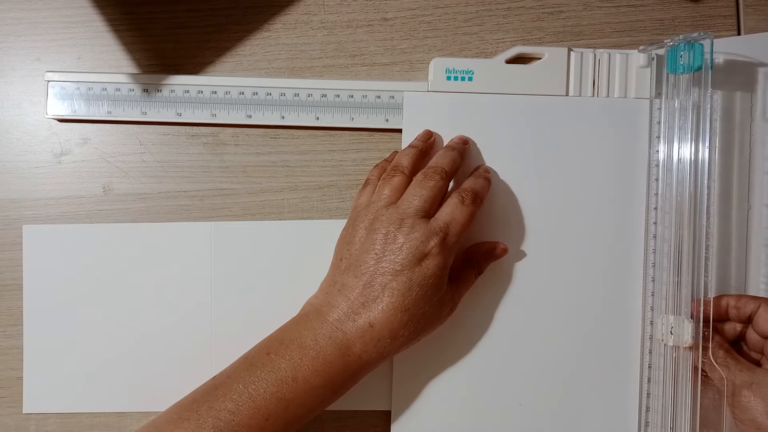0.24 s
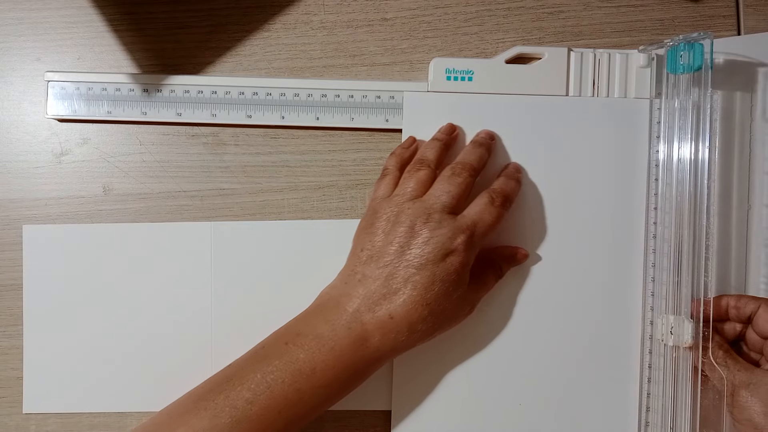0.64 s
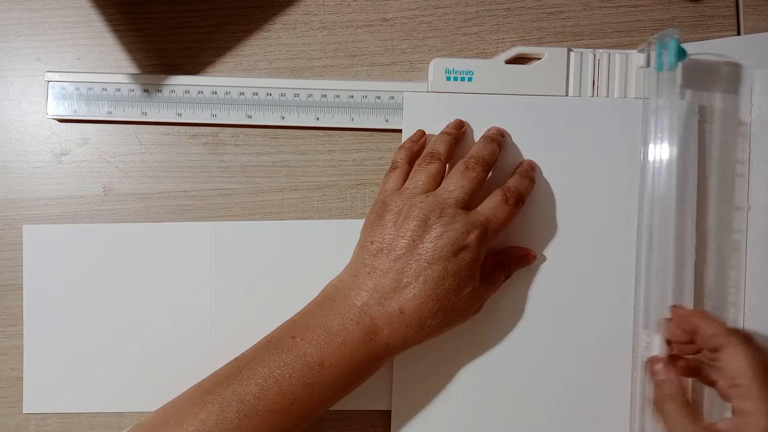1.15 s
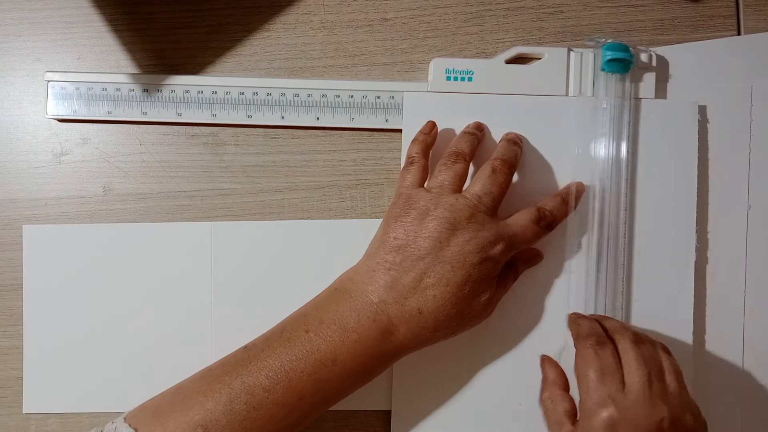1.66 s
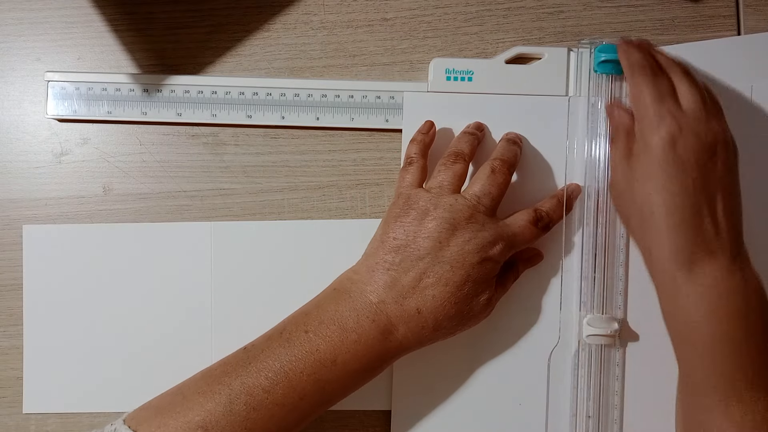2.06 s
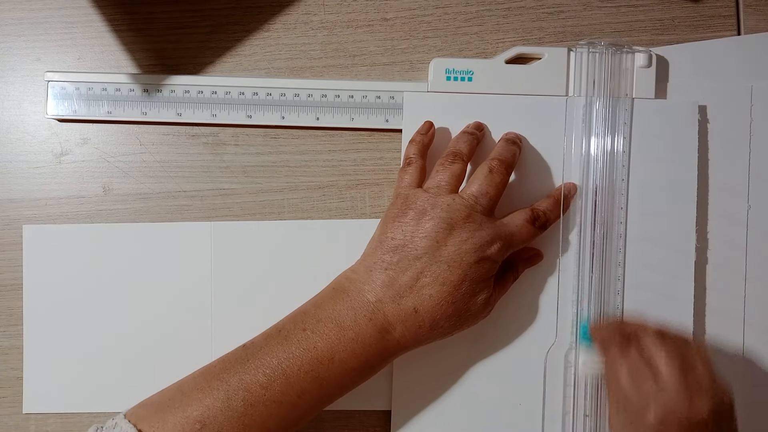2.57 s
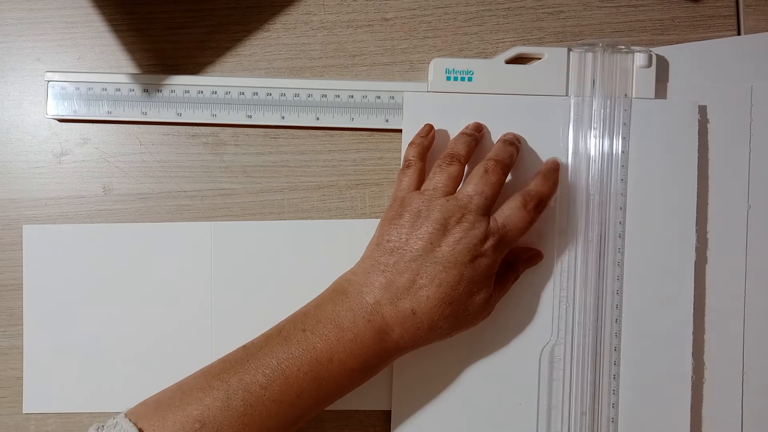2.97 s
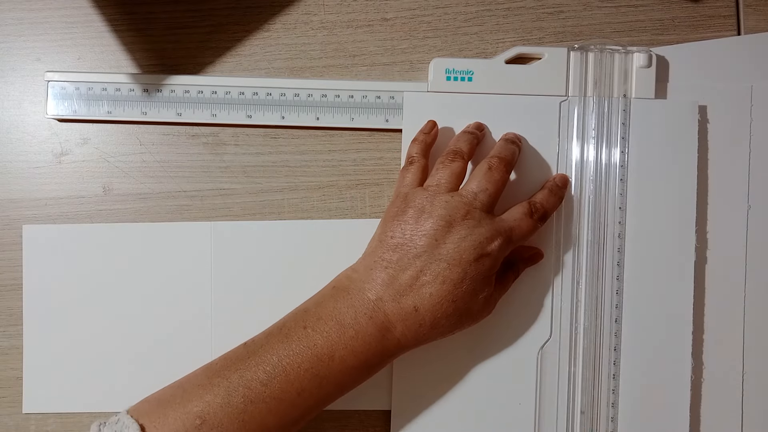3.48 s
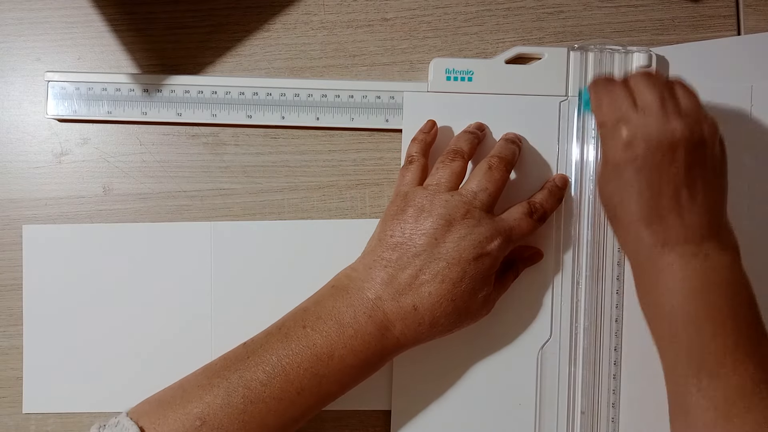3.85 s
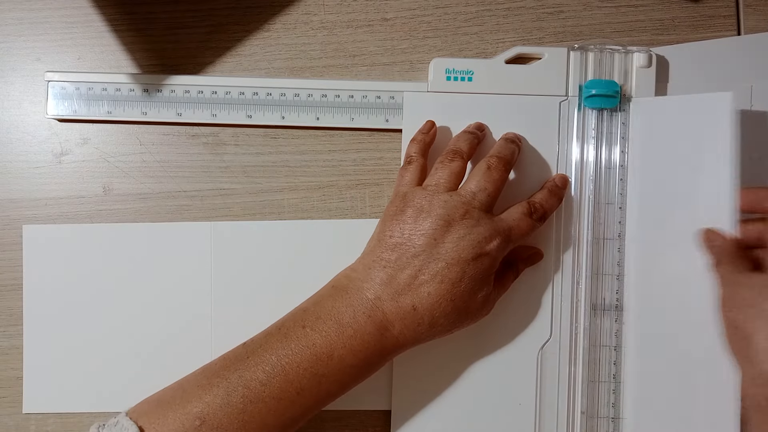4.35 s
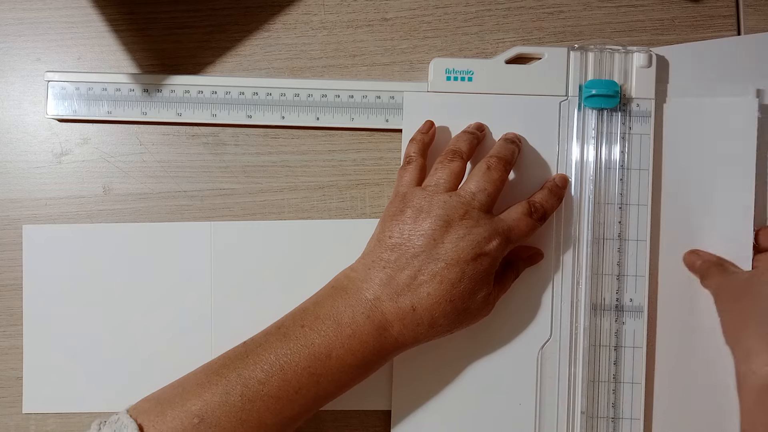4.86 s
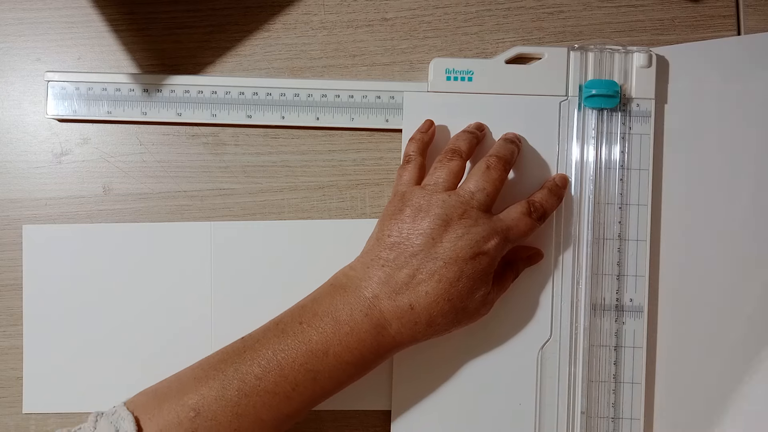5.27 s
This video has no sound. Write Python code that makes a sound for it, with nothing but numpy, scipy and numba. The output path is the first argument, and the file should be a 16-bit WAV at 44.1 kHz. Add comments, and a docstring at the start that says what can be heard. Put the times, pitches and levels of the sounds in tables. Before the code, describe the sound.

Plastic rail of a paper trimmer clacks over and snaps shut, a blade rasps quickly through paper, then the offcut rustles and snaps away.

```python
"""A plastic paper trimmer on a wooden desk in a small room; faint birds, and a soft low hum comes and goes.
First the clear rail is gripped and swung over in short clacks, then the carriage slides dully to its stop.
The rail snaps home; the blade rasps through the sheet, its rail resonance climbing, and stops.
A hand bumps the base; the offcut rubs, judders and snaps as it is drawn out and laid aside.
Contacts are noise bursts ringing damped modes; rubbing is coloured random slips; birds are gliding sines."""
import sys
import numpy as np
from scipy import signal
from scipy.fft import rfft, irfft
from scipy.io import wavfile
from scipy.ndimage import map_coordinates
from numba import njit

SR = 44100
rng = np.random.default_rng(int(sys.argv[2]) if len(sys.argv) > 2 else 0)


def dump(signal):
    """Clip the signal to [-1, 1] and save it as 16-bit WAV at the path in sys.argv[1]."""
    limited = np.clip(np.atleast_2d(signal).T, -1, 1)
    pcm = np.round(limited * 32767).astype(np.int16)
    wavfile.write(sys.argv[1], SR, pcm)


N = 243431
T = np.arange(N) / SR


def amp(db):
    """Decibels to gain."""
    return 10 ** (np.asarray(db) / 20)


def unit(x):
    """Scale to rms 1."""
    return x / np.sqrt(np.mean(x ** 2))


def walk(rate_hz):
    """Slow random curve of rms 1: straight lines between rate_hz random points per second."""
    return unit(np.interp(T * rate_hz, np.arange(N), rng.standard_normal(N)))


def envelope(start_s, hold_s, rise_s, fade_s):
    """Gain that rises exponentially to 1 at start_s, holds, and dies away exponentially."""
    before_s = np.minimum(T - start_s, 0)
    after_s = np.maximum(T - start_s - hold_s, 0)
    return np.exp(before_s / rise_s - after_s / fade_s)


def grains(rate_hz, spread_db):
    """Dense tiny slips of uneven size, at rms 1."""
    hits = rng.random(N) < rate_hz / SR
    return unit(hits * rng.standard_normal(N) * amp(spread_db * rng.standard_normal(N)))


def through(x, response):
    """Pass a sound through an impulse response."""
    return signal.fftconvolve(x, response)[:N]


def colour(points, tilt_db_per_octave=0, size=2048):
    """Minimum-phase response of unit energy with this spectrum, tilted above 512 Hz."""
    hz, level_db = np.transpose(points)
    octave = np.log2(np.maximum(np.arange(size // 2 + 1) * SR / size, 10))
    gain_db = np.interp(octave, np.log2(hz), level_db) + tilt_db_per_octave * np.maximum(octave, 9)
    cepstrum = irfft(np.log(amp(gain_db)))
    # fold the cepstrum to make the response causal
    cepstrum[1:size // 2] *= 2
    cepstrum[size // 2 + 1:] = 0
    response = irfft(np.exp(rfft(cepstrum)))
    return response / np.linalg.norm(response)


def ring(modes, detune=0):
    """Unit-energy sum of damped modes; detune is the random relative pitch spread, as parts seat differently."""
    t, y = T[:SR // 2], 0
    for hz, level_db, t60_s in modes:
        hz = hz * (1 + detune * rng.standard_normal())
        decay = np.exp(-np.log(1000) * t / t60_s)
        y = y + amp(level_db) * decay * np.sin(2 * np.pi * hz * t) * rng.choice([-1, 1])
    return y / np.linalg.norm(y)


def resonate(x, modes):
    """Parallel resonances (pitch_hz, width_hz, level_db), at rms 1."""
    bands = (amp(level_db) * signal.lfilter(*signal.iirpeak(hz, hz / width_hz, SR), x)
             for hz, width_hz, level_db in modes)
    return unit(sum(bands))


@njit
def sweep(x, hz, width_hz):
    """State-variable band-pass whose centre moves."""
    y, band, low = np.empty(len(x)), 0., 0.
    for i in range(len(x)):
        g, k = np.tan(np.pi * hz[i] / SR), width_hz / hz[i]
        v = (band + g * (x[i] - low)) / (1 + g * (g + k))
        band, low, y[i] = 2 * v - band, low + 2 * g * v, k * v
    return y


def brighten(x, bright_db, split_hz):
    """Trade lows for highs: positive values brighten the rub, negative ones dull it."""
    low = signal.sosfilt(signal.butter(1, split_hz, fs=SR, output="sos"), x)
    return low * amp(-bright_db / 2) + (x - low) * amp(bright_db / 2)


def patchy(x, depth_db, rate_hz, patch_hz):
    """As the contact shifts, patches of the spectrum swell and fade on their own; rms 1."""
    hz, s, bands = signal.stft(x, SR, nperseg=512)
    places = np.meshgrid(hz / patch_hz, s * rate_hz, indexing="ij")
    field = map_coordinates(rng.standard_normal((300, 900)), places, order=1, mode="mirror")
    return unit(signal.istft(bands * amp(depth_db * unit(field)), SR)[1][:N])


def tail(t60_s, treble_t60_s, build_s, split_hz=7500):
    """Diffuse noise echoes of unit energy; the top treble dies first."""
    t, y = T[:SR], 0
    for side, seconds in [("low", t60_s), ("high", treble_t60_s)]:
        split = signal.butter(4, split_hz, side, fs=SR, output="sos")
        band = signal.sosfilt(split, rng.standard_normal(SR))
        y = y + band * np.exp(-np.log(1000) * t / seconds) * (1 - np.exp(-(t / build_s) ** 2))
    return y / np.linalg.norm(y)


# air spectrum: [pitch_hz, level_db]
AIR_SPECTRUM = [(15, -71.5), (25, -4), (86, -0.5), (165, 1), (222, -13.5), (316, -5), (812, -11.5),
                (2810, -15.5), (3580, -12.5), (5520, -17), (6850, -19), (8270, -37), (10300, -41),
                (13400, -28), (15800, -42.5)]
AIR_DB = -76
# swells of the hum: [start_s, hold_s, level_db]
HUM_SWELLS = [(0.349, 0.033, -66.5), (0.434, 0.069, -64), (0.563, 0.032, -67), (0.654, 0.058, -68.5),
              (0.815, 0.051, -70), (0.987, 0.048, -70), (1.077, 0.11, -72), (1.43, 0.038, -67),
              (1.582, 0.13, -67.5), (1.863, 0.057, -61.5)]
HUM_HZ, HUM_WIDTH_HZ, HUM_REST_DB, HUM_RISE_S, HUM_FADE_S = 224.3, 26, -81, 0.0084, 0.022


def room_tone():
    """Noise shaped into quiet air, a deep rumble and a narrow low hum that swells and fades."""
    air = unit(through(rng.standard_normal(N), colour(AIR_SPECTRUM, size=8192)))
    air = air * amp(AIR_DB + .5 * walk(0.84))
    hum_mode = [(HUM_HZ, HUM_WIDTH_HZ, 0)]
    hum = resonate(resonate(rng.standard_normal(N), hum_mode), hum_mode)
    swells = sum(amp(level_db) * envelope(start_s, hold_s, HUM_RISE_S, HUM_FADE_S)
                 for start_s, hold_s, level_db in HUM_SWELLS)
    hum = hum * np.hypot(amp(HUM_REST_DB), swells)
    rumble = resonate(resonate(rng.standard_normal(N), [(83.5, 63, 0)]), [(89, 99, 0)])
    return air + hum + rumble * amp(-78.5 + 2 * walk(0.43))


# one bird's repeated rising call: [start_s]
CALL_STARTS = [1.666, 1.909, 2.155]
CALL_S, CALL_START_HZ, CALL_END_HZ, CALL_DB, CALL_TRILL_DEPTH_HZ = .085, 1650, 2620, -66, 255
# whistles of other birds: [start_s, length_s, start_hz, end_hz, level_db, trill_depth_hz]
WHISTLES = [(0.482, .27, 4000, 3910, -74.5, 90), (.61, 0.084, 4730, 4200, -64.5, 440),
            (0.662, 0.25, 2580, 2393, -70, 142), (0.754, 0.14, 4190, 4450, -63, 293),
            (.92, 0.072, 4530, 4230, -65.5, 250), (0.986, 0.062, 3740, 3375, -71, 348),
            (1.235, 0.136, 3390, 3605, -76, 30), (1.521, .12, 3700, 4250, -73, 430),
            (1.719, .1, 4730, 5060, -65, 250), (2.027, .075, 4580, 4970, -70.5, 200),
            (2.265, 0.085, 3910, 3830, -63.5, 400), (2.425, 0.08, 3184, 3280, -62.5, 171),
            (2.408, .06, 4070, 4200, -65.5, 410), (2.513, .05, 4340, 4080, -63.5, 300),
            (2.996, 0.11, 3310, 3600, -59.5, 240), (3.468, 0.075, 4900, 4300, -65.5, 250),
            (5.477, 0.047, 4930, 4380, -71, 250)]


def birds():
    """Sines with a rough trill that glide and level off, blurred on their way indoors."""
    out = np.zeros(N)
    trill_rate_hz = 140 * amp(3 * walk(120))
    trill = np.sin(2 * np.pi * np.cumsum(trill_rate_hz) / SR)
    calls = [(start_s, CALL_S, CALL_START_HZ, CALL_END_HZ, CALL_DB, CALL_TRILL_DEPTH_HZ)
             for start_s in CALL_STARTS]
    for start_s, length_s, start_hz, end_hz, level_db, trill_depth_hz in calls + WHISTLES:
        on = (T > start_s) & (T < start_s + length_s)
        progress = (T[on] - start_s) / length_s
        glide_hz = start_hz + (end_hz - start_hz) * np.sin(np.pi / 2 * progress)
        hz = glide_hz + trill_depth_hz * trill[on]
        swell = np.sqrt(np.sin(np.pi * progress))
        out[on] += amp(level_db) * swell * np.sin(2 * np.pi * np.cumsum(hz) / SR)
    return out + through(out, tail(t60_s=0.3, treble_t60_s=0.25, build_s=0.0037))


# rub spectrum: [pitch_hz, level_db]
RUB_SPECTRUM = [(59, -53.5), (100, -8), (259, -18.5), (450, -7), (580, -18.5), (717, -8), (797, -21.5),
                (1190, -6), (1940, -7), (2670, -2.5), (6490, -3.5), (8020, -15.5), (10100, -12),
                (13100, -27.5), (15800, -16.5)]
# sheet shifted under the hand, carriage slid dully along the rail, offcut drawn out and laid aside:
# [full_level_s, hold_s, rise_s, fade_s, level_db, bright_db]
RUBS = [(.45, 0.33, .05, .05, -79, 12), (0.803, 0.027, .025, 0.036, -62.5, -1.5),
        (.95, 1.6, .05, 0.27, -82.5, -5.5), (2.57, 0.53, .15, .05, -70.5, -14),
        (4.199, 0.074, .0006, .03, -65.5, 11), (4.264, 0.15, .01, .03, -56.5, 12),
        (4.402, 0.024, .012, 0.024, -36, -1), (4.478, 0.052, .02, 0.052, -51.5, -20),
        (4.717, 0.055, 0.022, 0.048, -62.5, -5.5), (4.87, 0.012, .006, 0.17, -55.5, -7.5),
        (5.012, 0.057, .015, 0.05, -58.5, 7.5), (5.144, 0.035, 0.011, 0.097, -60, 11.5),
        (5.296, 0.076, 0.046, 0.035, -69, 12)]


def rubbing():
    """Sheet and sliding carriage rub in uneven slips; each move swells, holds and dies away."""
    rub = through(grains(rate_hz=9000, spread_db=-1.5), colour(RUB_SPECTRUM))
    rub = patchy(rub, depth_db=3, rate_hz=35, patch_hz=400)
    gains = [amp(level_db) * envelope(full_level_s, hold_s, rise_s, fade_s)
             for full_level_s, hold_s, rise_s, fade_s, level_db, _ in RUBS]
    powers = np.array(gains) ** 2 + 1e-20
    power = powers.sum(axis=0)
    # brightness averaged over the moves, weighted by power
    bright_db = np.array(RUBS)[:, -1] @ powers / power
    return brighten(rub, bright_db, split_hz=1260) * np.sqrt(power) * amp(2.3 * walk(110))


# sheet edge juddering over the base: [start_s, hold_s, level_db, resonance_hz]
JUDDERS = [(4.194, 0.056, -52.5, 1343), (4.344, 0.17, -52.5, 1243), (5.155, 0.088, -65.5, 1620)]
JUDDER_RISE_S, JUDDER_FADE_S, JUDDER_SAG_OCTAVES_PER_S, JUDDER_OCTAVE_DB = .0005, 0.039, 0.64, -15


def sheet_edge():
    """The dragged edge judders in a resonance and its octave, which sag as more of the sheet hangs free."""
    gain, hz = 0, JUDDERS[0][-1]
    for start_s, hold_s, level_db, resonance_hz in JUDDERS:
        gain = gain + amp(level_db) * envelope(start_s, hold_s, JUDDER_RISE_S, JUDDER_FADE_S)
        sagging_hz = resonance_hz * 2 ** (-JUDDER_SAG_OCTAVES_PER_S * (T - start_s))
        hz = np.where(T < start_s, hz, sagging_hz)
    hz = hz * amp(0.14 * walk(60))
    slips = grains(rate_hz=3000, spread_db=4)
    lower = unit(sweep(sweep(slips, hz, 400.), hz, 400.))
    upper = unit(sweep(sweep(slips, 2 * hz, 400.), 2 * hz, 400.))
    return gain * (lower + amp(JUDDER_OCTAVE_DB) * upper)


# rail and base: [pitch_hz, level_db, t60_s]
RAIL_MODES = [(707, 11.5, 0.15), (840, -10, 0.13), (980, 12, 0.039), (1208, 7, 0.14), (1733, 2, 0.028),
              (1964, 3.5, .09), (2140, -13.5, 0.1), (2210, 3, 0.19), (2660, -1.5, 0.1), (3160, 12, 0.034),
              (3420, -30, .12), (3850, 21, 0.065), (4220, 7.5, 0.15), (4240, 6, .09), (6900, 2, 0.13)]
# desk top, also under the blade: [pitch_hz, level_db, t60_s]
DESK_MODES = [(76.4, -4, 0.41), (102, -0.5, 0.24), (125, -14, 0.7), (198, -0.5, 0.055), (207.6, 2.5, 0.22),
              (234.5, 0, 0.13), (298.5, -6, 0.16), (364, -2, 0.048), (429, -2, 0.1)]


def blows(rows, spectrum, ring_db):
    """Parts scrape, meet in one hard contact and chatter out; this rings the rail and thumps the desk."""
    out, lead = np.zeros(N + SR), SR // 30
    ms = (np.arange(SR // 7) - lead) * 1000 / SR
    for contact_s, level_db, scrape_ms, decay_ms, tilt_db_per_octave, thump_db in rows:
        fade = np.exp(np.where(ms < 0, ms / scrape_ms, -ms / decay_ms))
        force = rng.standard_normal(len(ms)) * fade
        force[lead] += 1.9  # hard contact
        crack = signal.fftconvolve(force, colour(spectrum, tilt_db_per_octave))
        crack /= np.linalg.norm(crack)
        body = signal.fftconvolve(crack, ring(RAIL_MODES, detune=.02))
        body *= amp(ring_db) / np.linalg.norm(body)
        body[:len(crack)] += crack
        thump = amp(thump_db) * ring(DESK_MODES, detune=.03)
        body[lead:lead + len(thump)] += thump
        start = int(contact_s * SR) - lead
        # longer bursts carry more energy
        out[start:start + len(body)] += amp(level_db) * np.linalg.norm(fade) * body
    return out[:N]


# sheet spectrum: [pitch_hz, level_db]
SHEET_SPECTRUM = [(100, -33), (300, -22), (520, -14.5), (950, -6), (1250, 3.5), (1700, -3.5), (2150, 1.5),
                  (4000, -4), (6800, -3.5), (8300, -17.5), (10200, -14.5), (13000, -41), (15300, -30.5)]
# snaps and flaps; level before burst-energy scaling, thump relative to the crack:
# [contact_s, level_db, scrape_ms, decay_ms, tilt_db_per_octave, thump_db]
SNAPS = [(4.360, -36, 5.2, 5.3, -2, -25), (4.392, -32.5, 1.5, 4.7, 4, -21),
         (4.407, -31.5, 0.74, 26, 12.5, -24), (4.439, -31.5, 11, 12, 7.5, -26.5),
         (4.555, -48.5, 0.86, 6.9, -13, -5.5), (4.762, -58, 4, 28, -13.5, -24),
         (4.874, -37.5, 2.2, 3.8, -3, -17), (5.032, -43, 1.4, 6.5, -2.5, -18),
         (5.073, -59, 3.4, 6.2, 7, -30), (5.1245, -24, 0.55, 1.96, -1.5, -48),
         (5.129, -33, 0.4, 1.4, -2, -36), (5.408, -50.5, 2.3, 4.8, 13, -38)]


def sheet_snaps():
    """The sheet snaps and flaps in crackling bursts that ring the rail weakly."""
    return blows(SNAPS, SHEET_SPECTRUM, ring_db=-16.5)


# plastic spectrum: [pitch_hz, level_db]
PLASTIC_SPECTRUM = [(25, -45.5), (70, -32), (200, -12.5), (480, -21), (730, -11), (1080, 1), (1500, -8),
                    (1900, 2), (3400, -1), (6800, -5), (8400, -18), (10200, -15), (13000, -33),
                    (15300, -31)]
# rail swung over, carriage drawn back, rail pressed home, stroke end and hand bumps; levels as for snaps:
# [contact_s, level_db, scrape_ms, decay_ms, tilt_db_per_octave, thump_db]
KNOCKS = [ (0.442, -56.5, 6.4, 14, 2.5, -35), (0.801, -56.5, 4, 9, 1, -34),
          (0.890, -48, 0.74, 7.2, 0.5, -22), (1.0515, -37, 1.8, 4.9, -4.5, -26),
          (1.105, -63.5, 4.8, 4.5, -8, 6.5), (1.770, -43, 4.2, 9.5, -5, -36),
          (1.788, -33.5, 0.39, 3.16, -2, -14.5), (2.240, -58.5, 6.5, 8.6, -3, -6.5),
          (2.324, -63, 4.8, 15, -5, -25), (2.454, -61, 5, 18, -2, -15), (2.616, -28.5, .44, 9, -0.5, -31),
          (2.630, -47, 1.7, 3.2, 12, -17), (2.644, -35, 2, 3.4, -1, -18), (2.830, -54, 6, 26, -6.5, -14),
          (3.051, -40, 6.4, 3.9, 0, -11.5), (3.063, -30.5, 0.94, 8.7, -4.5, -14),
          (3.097, -45, 2, 5.5, -1, -17), (3.124, -46.5, 2.5, 8.6, -11, -25),
          (3.191, -40.5, 2.1, 7.1, 7, -30), (3.1985, -26, 2.5, 4.2, -9.5, -8.5),
          (3.2045, -20.5, 1.1, 2.4, 0, -10), (3.222, -41, 1.7, 23, 10, -14),
          (3.2567, -31.5, 0.77, 1.8, -0.5, -10.5), (3.362, -53, 1.4, 7.2, -6.5, -2),
          (3.414, -52, 2.8, 6, -11, -8), (4.002, -47, .3, 2.2, -3.5, 4.5),
          (4.026, -49.5, 0.64, 11, -9, -14), (4.195, -51, 0.17, 1.5, -4, 1),
          (4.222, -62.5, 1.4, 2.9, 2.5, 13), (4.618, -49, 0.35, 2.5, -2.5, 6),
          (4.635, -57.5, .8, 6.4, 1, 3.5)]


def trimmer_knocks():
    """Plastic parts clack together, ring the rail and base, and thump the desk."""
    return blows(KNOCKS, PLASTIC_SPECTRUM, ring_db=-9.0)


# fibre rasp spectrum: [pitch_hz, level_db]
CUT_SPECTRUM = [(35, -42), (60, -9), (211, -12.5), (345, -15), (436, -8.5), (632, -18.5), (940, -2),
                (1500, -7), (3310, -0.5), (5160, -2), (6510, 3), (8220, -9), (9910, -7.5), (13100, -24.5),
                (15800, -11)]
# carriage resonances: [pitch_hz, width_hz, level_db]
CARRIAGE_MODES = [(2240, 660, 6), (2970, 120, -4), (3354, 170, 4.5), (4600, 190, 5), (6330, 300, -10),
                  (10000, 400, 1)]
CUT_START_S, CUT_HOLD_S, CUT_RISE_S, CUT_FADE_S = 3.523, 0.41, 0.0028, 0.017
CUT_ENDS_DB, CUT_ARCH_DB = -42.5, 2  # push gain at the ends, extra in mid-stroke
CUT_BRIGHT_DB, CUT_DULLING_DB = 4, 5.5  # brightness at first, its loss by the end
RAIL_START_HZ, RAIL_END_HZ = 850, 1310


def blade():
    """The blade parts fibres in a dense rasp; the rail resonance climbs with the carriage, the desk rumbles."""
    travel = np.clip((T - CUT_START_S) / CUT_HOLD_S, 0, 1)
    push = amp(CUT_ENDS_DB + CUT_ARCH_DB * np.sin(np.pi * travel) + .5 * walk(90))
    push = push * envelope(CUT_START_S, CUT_HOLD_S, CUT_RISE_S, CUT_FADE_S)
    rasp = through(grains(rate_hz=14000, spread_db=0.0), colour(CUT_SPECTRUM))
    rasp = patchy(rasp, depth_db=3, rate_hz=45, patch_hz=260)
    # the carriage rocks, so each of its resonances swells on its own
    carriage = 0
    for mode in CARRIAGE_MODES:
        swell = amp(mode[2] + 3.5 * walk(35))
        carriage = carriage + swell * resonate(grains(rate_hz=10000, spread_db=-0.5), [mode])
    carriage = unit(carriage)
    rail_hz = RAIL_START_HZ * (RAIL_END_HZ / RAIL_START_HZ) ** travel * amp(0.36 * walk(30))
    rail = unit(sweep(grains(rate_hz=6000, spread_db=2.5), rail_hz, 54.0))
    rumble = through(grains(rate_hz=680, spread_db=-0.5), ring(DESK_MODES))
    bright_db = CUT_BRIGHT_DB - CUT_DULLING_DB * travel
    grit = brighten(rasp + amp(-4) * carriage, bright_db, split_hz=670)
    return push * (grit + amp(-12.5) * rail + amp(-26.5) * rumble)


def scene():
    """Everything on the desk shares one small room; both channels are alike."""
    near = rubbing() + sheet_edge() + sheet_snaps() + trimmer_knocks() + blade()
    # small things radiate little deep bass
    near = signal.sosfilt(signal.butter(4, 58, "high", fs=SR, output="sos"), near)
    echoes = through(near, tail(t60_s=0.24, treble_t60_s=0.15, build_s=0.0052))
    mono = room_tone() + birds() + near + amp(-10) * echoes
    return np.array([mono, mono])


TOP_HZ = 15900


def record(dry):
    """The phone cuts the top: a steep elliptic low-pass."""
    return signal.sosfilt(signal.ellip(10, .2, 70, TOP_HZ, fs=SR, output="sos"), dry)


dry = scene()
out = record(dry)
dump(out)
```